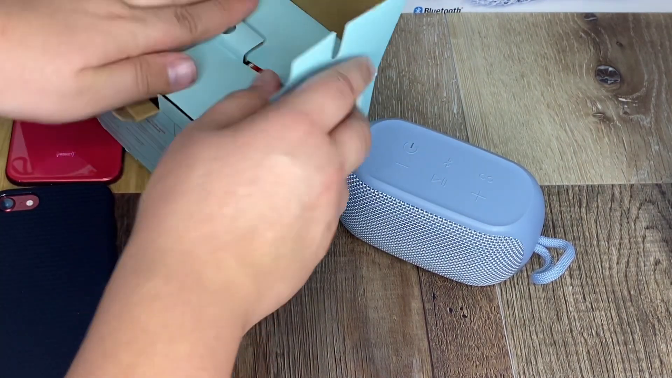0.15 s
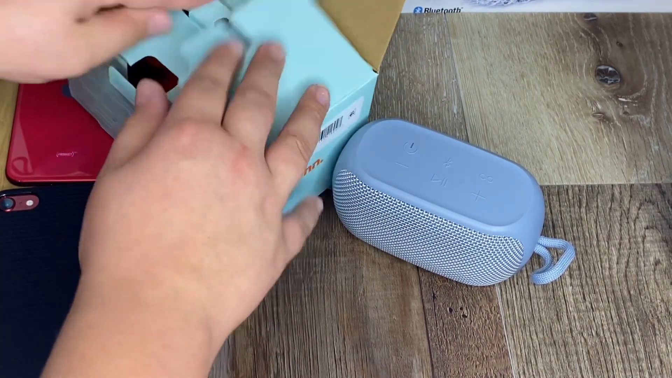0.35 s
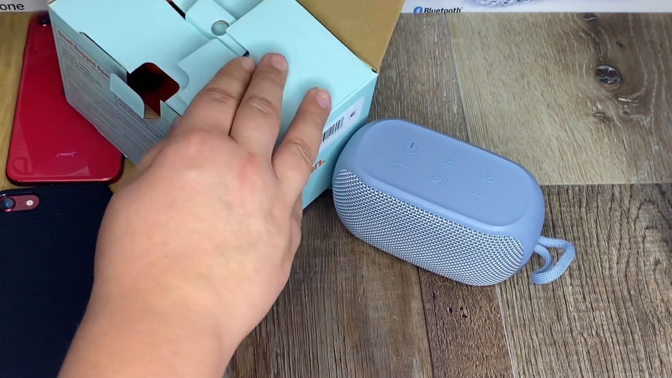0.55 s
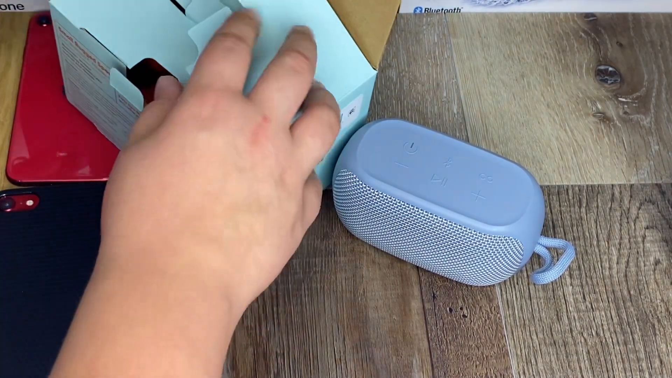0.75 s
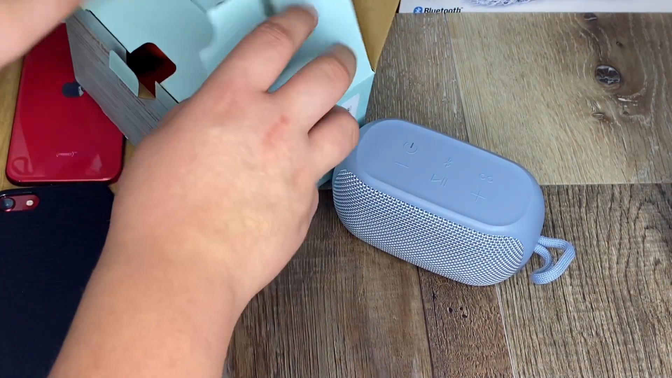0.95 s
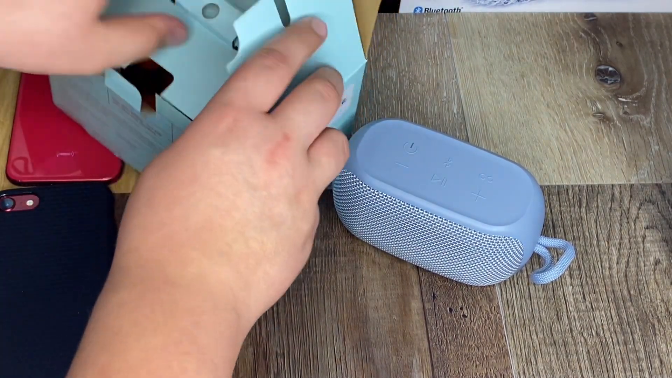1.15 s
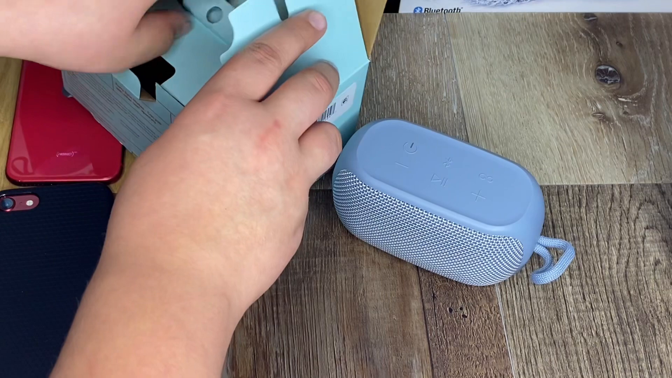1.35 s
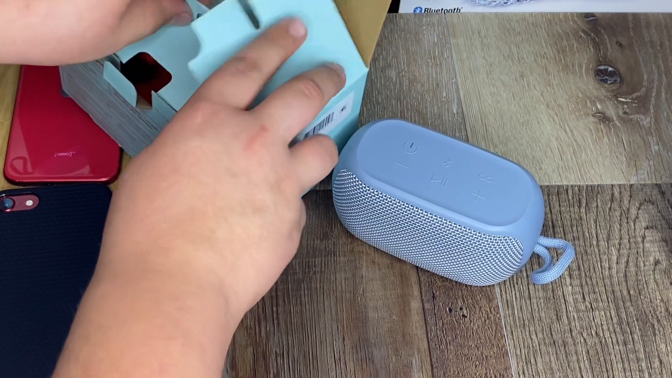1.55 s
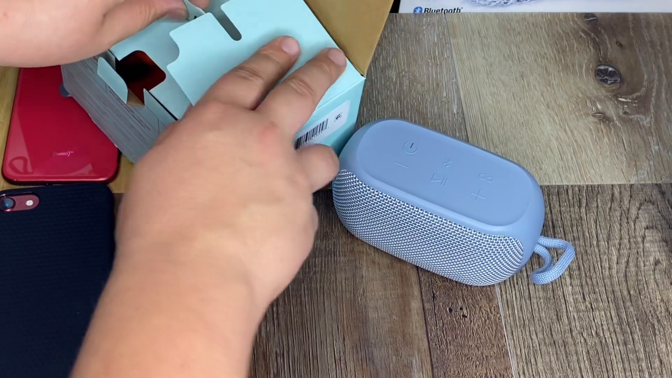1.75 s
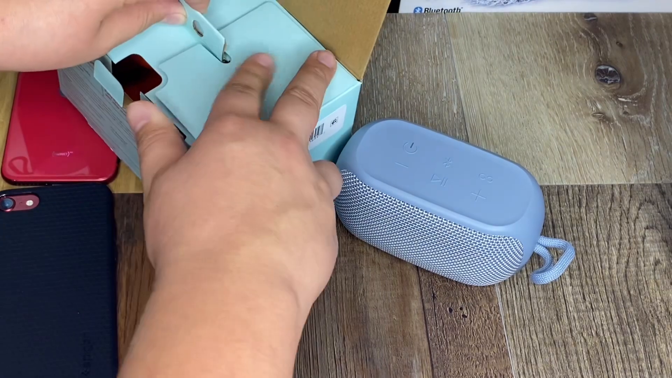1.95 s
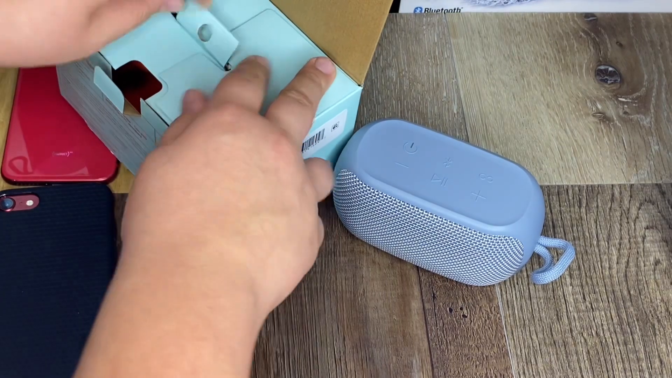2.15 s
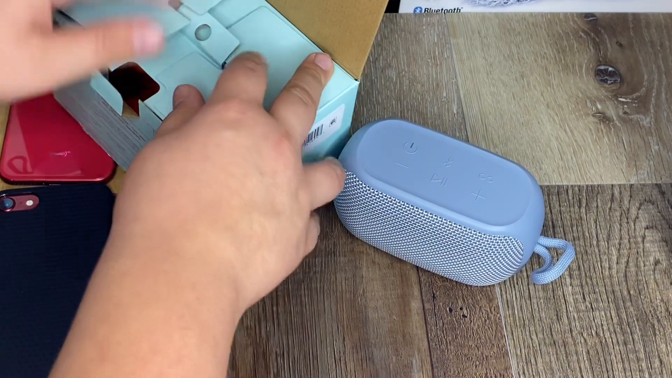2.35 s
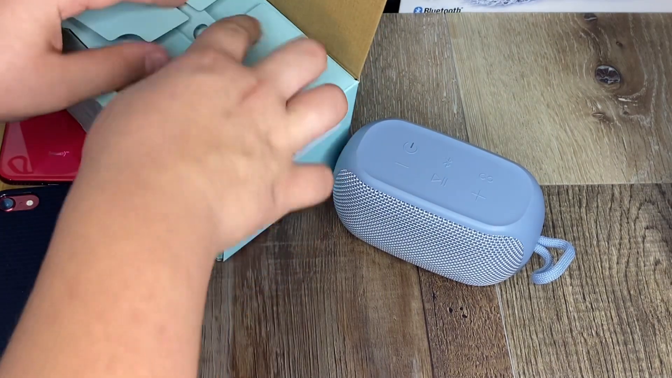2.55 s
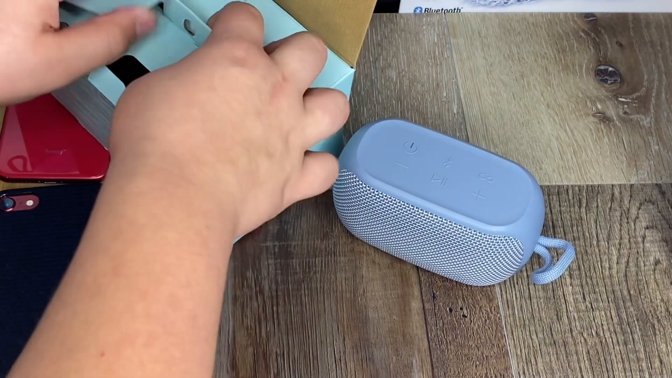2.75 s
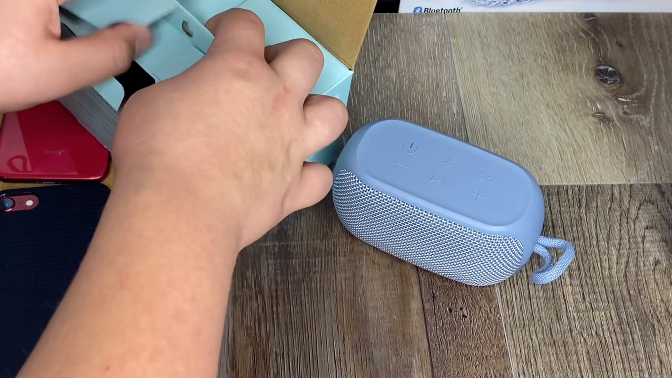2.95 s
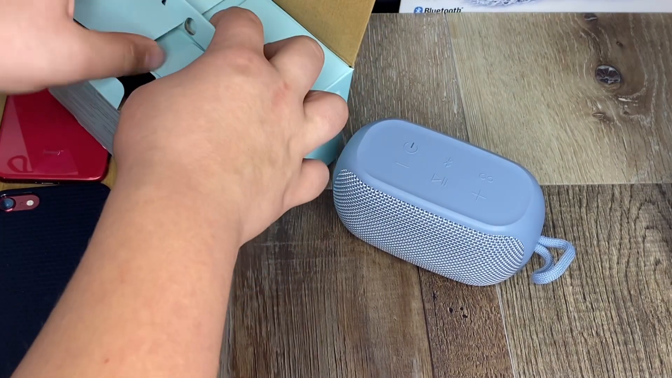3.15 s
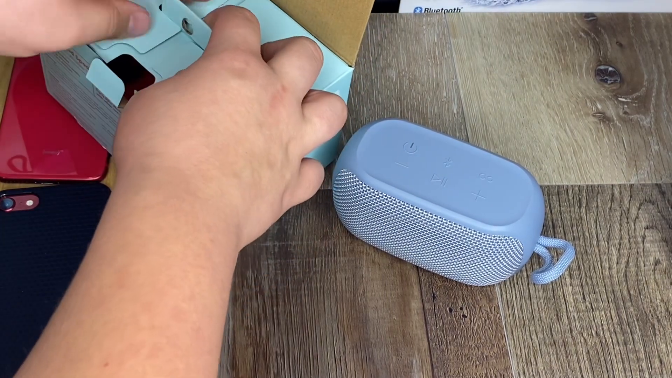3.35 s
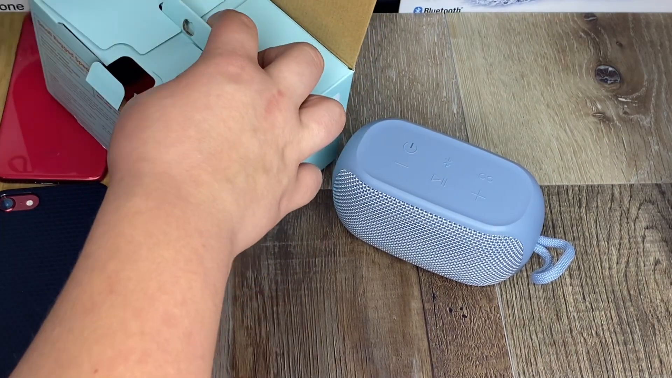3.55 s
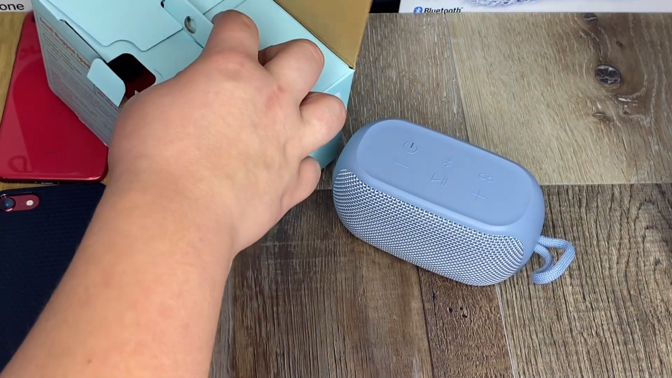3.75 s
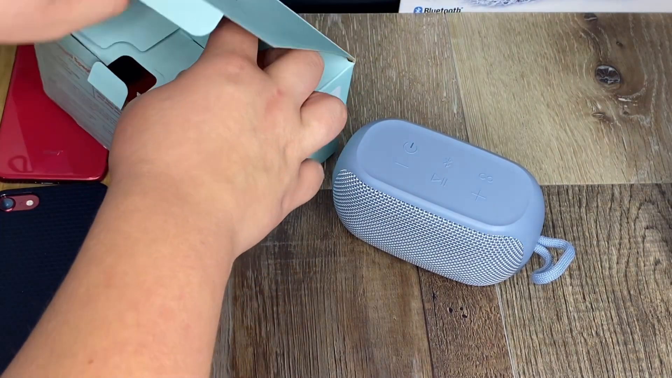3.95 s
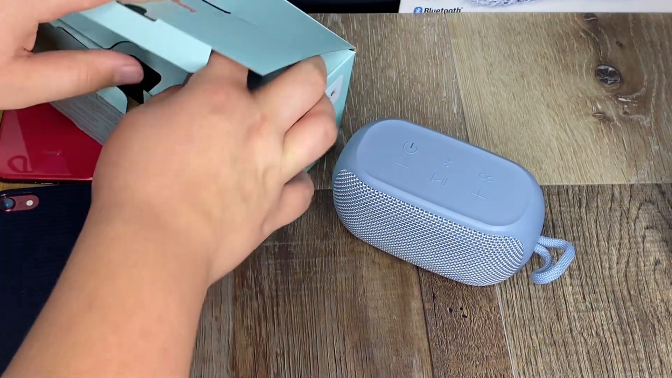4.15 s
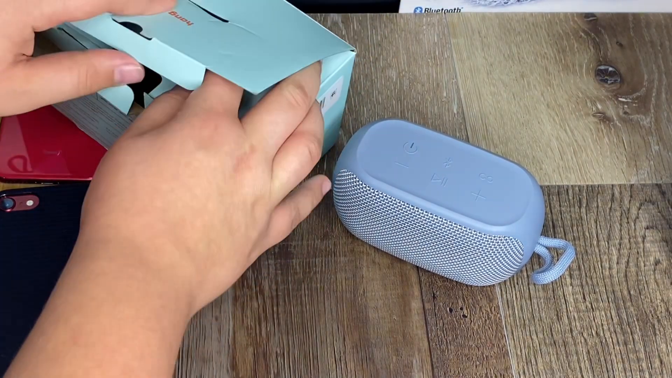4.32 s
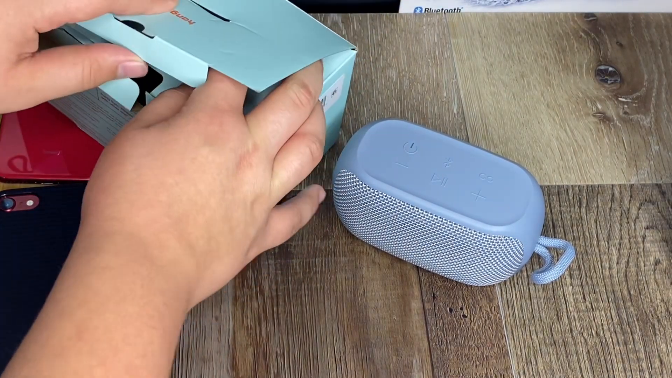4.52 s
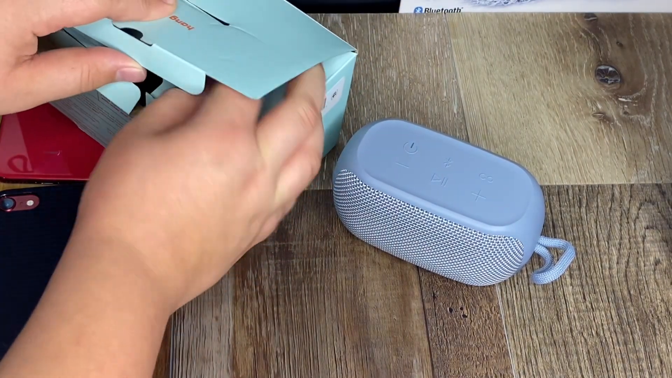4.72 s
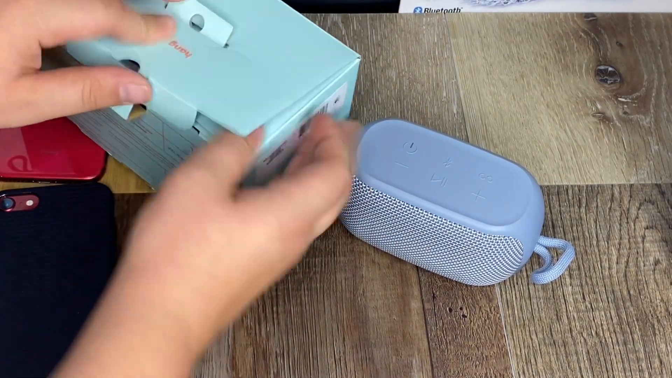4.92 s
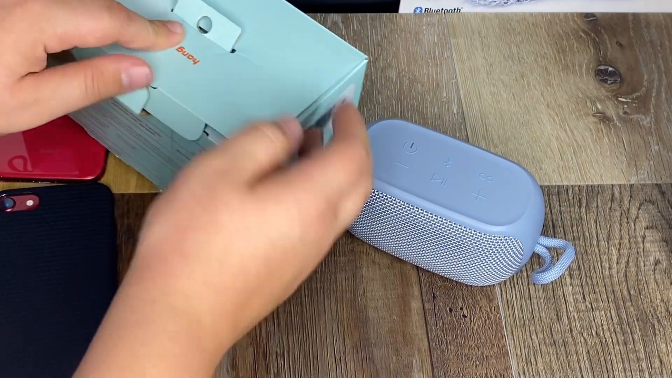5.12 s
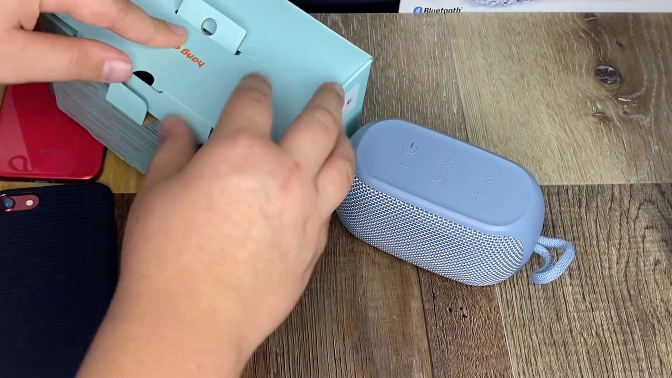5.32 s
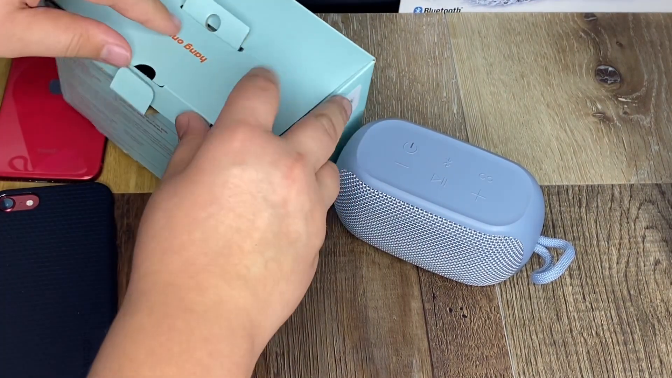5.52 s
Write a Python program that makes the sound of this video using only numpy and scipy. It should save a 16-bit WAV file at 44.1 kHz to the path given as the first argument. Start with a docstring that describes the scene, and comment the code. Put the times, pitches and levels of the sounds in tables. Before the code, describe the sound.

Two hands pack a small paperboard box on a table. Inserts and flaps slide with a dry, grainy rasp, broken by sharp little snaps, hollow knocks and a few brief squeaks. An insert drops in with a low thump and a cluster of cracks. Near the end the lid tab pops home loudly and fingers pat the lid. The microphones are close, in a small room with a faint low hum.

```python
"""Packing a paperboard box

Two hands pack a small box on a table in a small room, close to a pair of microphones.
Inserts and flaps slide with a grainy rasp as their fibres catch and let go. Edges snag and snap
free, and the hollow box answers with short knocks. An insert drops in with a low thump, the lid
tab is pushed home with a loud pop, then fingers pat the lid."""
import sys
import numpy as np
from scipy import signal
from scipy.fft import rfft, irfft, next_fast_len
from scipy.io import wavfile

SR = 44100
rng = np.random.default_rng(int(sys.argv[2]) if len(sys.argv) > 2 else 0)


def inscribe(sig):
    """Save sig as 16-bit PCM at rate SR to the path in sys.argv[1].

    A 1-D sig is mono; a 2-D sig holds one channel per row.
    Samples are clipped to [-1, 1] before scaling.
    """
    pcm = np.round(np.clip(np.atleast_2d(sig).T, -1, 1) * 32767)
    wavfile.write(sys.argv[1], SR, pcm.astype(np.int16))


N = 250488
T = np.arange(N) / SR


def from_db(db):
    """Decibels to gain."""
    return 10 ** (np.asarray(db) / 20)


def unit_rms(x):
    """Scale to an rms of 1."""
    return x / np.sqrt(np.mean(x ** 2) + 1e-20)


def at_hz(curve, hz):
    """Read a curve on a log-frequency axis."""
    freqs, values = np.transpose(curve)
    return np.interp(np.log(hz + 1e-3), np.log(freqs), values)


def filtered(x, response):
    """Pass x through a frequency response, given as a function of Hz."""
    size = next_fast_len(x.shape[-1] + 4096)
    hz = np.arange(size // 2 + 1) * SR / size
    return irfft(rfft(x, size) * response(hz), size)[..., :x.shape[-1]]


def eq(x, curve):
    """Filter x by a curve of freq_hz, gain_db."""
    return filtered(x, lambda hz: from_db(at_hz(curve, hz)))


def unity_eq(x, curve):
    """Colour white input without changing its power."""
    power = np.mean(from_db(at_hz(curve, np.linspace(0, SR / 2, 2000))) ** 2)
    return eq(x, curve) / np.sqrt(power)


def drift(rate_hz):
    """A random modulator that glides from value to value, with an rms of 1."""
    knots = rng.standard_normal(4000)
    return unit_rms(np.interp(T * rate_hz, np.arange(len(knots)), knots))


def add(out, start_s, sound):
    """Mix a sound into out at start_s."""
    start = max(int(start_s * SR), 0)
    out[start:start + len(sound)] += sound[:N - start]


def resonance(x, hz, width_hz):
    """One resonance with a peak gain of 1."""
    radius = np.exp(-np.pi * width_hz / SR)
    poles = [1, -2 * radius * np.cos(2 * np.pi * hz / SR), radius ** 2]
    return signal.lfilter(np.array([1, 0, -1]) * (1 - radius ** 2) / 2, poles, x + 1e-18)


def ring(clicks, hz, t60_s):
    """Each click sets off a decaying sine of its own height."""
    radius, angle = np.exp(-np.log(1000) / (t60_s * SR)), 2 * np.pi * hz / SR
    return signal.lfilter([0, np.sin(angle)], [1, -2 * radius * np.cos(angle), radius ** 2], clicks + 1e-18)


# Bass-heavy colour of the room tone: freq_hz, gain_db
ROOM_TONE_EQ = [(20, -27.5), (33, -6), (48, 6), (75, 4.5), (140, -9.5), (200, -14), (600, -25.5),
                (1200, -33.5), (4000, -40.5), (16000, -57.5)]
# Stereo width of the room tone and the reverb: freq_hz, side_gain_db
ROOM_WIDTH = [(60, -19), (200, -8), (500, 2), (1200, 3), (2000, -4), (3500, -14), (7000, -6), (10000, -3)]
# Faint hum in the room: pitch_hz, rms_db
HUM = [(59.5, -66.5), (91.3, -59.5), (143, -68), (183, -78)]


def room_tone():
    """Low room noise, nearly alike on both sides, and a wavering hum."""
    mid, side = eq(rng.standard_normal((2, N)), ROOM_TONE_EQ)
    side = eq(side, ROOM_WIDTH)
    hum = sum(from_db(db) * np.sqrt(2) * np.sin(2 * np.pi * hz * T + .5 * drift(4.7)) for hz, db in HUM)
    return from_db(-60.5) * unit_rms(np.array([mid + side, mid - side])) + hum


# Early reflections off the table and nearby things, ahead of the width EQ: delay_ms, left_db, right_db
REFLECTIONS = [(4.3, -29, -24.5), (9.6, -24.5, -14), (11.7, -26.5, -20.5), (16.4, -14.5, -17)]
# Colour of the reverb tail: freq_hz, gain_db
TAIL_EQ = [(60, 0), (150, 3), (230, 1.5), (400, 1), (650, -4), (1200, 2), (2500, -5), (5000, -4),
           (9000, -12.5), (16000, 0)]


def reverb(x, tail_db, low_t60_s, high_t60_s, build_s):
    """The small room returns a few near echoes and a short diffuse tail."""
    t = T[:int(.8 * SR)]
    tail = np.zeros((2, len(t)))
    for band, t60_s in ("low", low_t60_s), ("high", high_t60_s):
        crossover = signal.butter(2, 2500, band, fs=SR, output="sos")
        tail += signal.sosfilt(crossover, rng.standard_normal(tail.shape)) * np.exp(-np.log(1000) * t / t60_s)
    tail *= 1 - np.exp(-(t / build_s) ** 2)
    mid, side = from_db(tail_db) * eq(tail / np.linalg.norm(tail[0]), TAIL_EQ)
    for delay_ms, left_db, right_db in REFLECTIONS:
        at = int(delay_ms * SR / 1000)
        mid[at] += (from_db(left_db) + from_db(right_db)) / 2
        side[at] += (from_db(left_db) - from_db(right_db)) / 2
    side = eq(side, ROOM_WIDTH)
    return signal.fftconvolve(x[None], np.array([mid + side, mid - side]), axes=1)[:, :N]


# Hand strokes; the two long, faint ones are the hands shifting their grip:
# start_s, length_s, level_db, brightness_db
STROKES = [(-.03, .3, -43, -2.5), (0.291, .12, -49, 3.5), (0.553, .085, -65.5, 12), (0.67, .17, -64, 1),
           (0.835, 2.64, -57, -7), (0.854, 0.32, -52.5, 5), (1.11, 0.097, -40.5, -3),
           (1.25, 0.24, -53, -0.5), (1.559, 0.061, -45, 0.5), (1.655, .17, -45.5, -1),
           (1.831, 0.046, -43.5, -1.5), (2.099, 0.072, -43, 3.5), (2.23, 0.14, -56.5, 3.5),
           (2.324, 0.043, -43, -1), (2.439, 0.27, -56, 2.5), (2.932, 0.069, -56.5, -1.5),
           (3.04, 0.12, -53.5, 7.5), (3.184, 0.082, -47, 1.5), (3.334, 0.11, -60.5, 6.5),
           (3.697, 1.7, -57, -16), (3.787, 0.12, -42.5, 5), (3.95, 0.15, -63.5, 15),
           (4.068, 0.073, -47.5, -2), (4.186, 0.062, -48, -2), (4.482, 0.37, -56.5, -5),
           (4.683, 0.19, -47.5, 0), (4.882, 0.079, -43.5, 7.5), (4.933, 0.16, -40, -21.5),
           (5.141, 0.033, -56.5, 11), (5.233, 0.076, -45, -7), (5.336, 0.17, -46, -16),
           (5.498, .11, -50.5, -0.5)]


def stroke_envelopes(attack_s=0.02, release_s=0.049):
    """Each push swells, holds and fades in rub, rasp and hiss; overlapping strokes add in power."""
    power = np.zeros((3, N))
    for start_s, length_s, db, bright_db in STROKES:
        swell = np.clip((T - start_s) / attack_s, 0, 1)
        fade = np.exp(-np.clip((T - start_s - length_s) / release_s, 0, 20))
        rasp_db = db - 8 + 0.64 * bright_db
        hiss_db = db - 11.5 + bright_db
        power += np.outer(from_db([db, rasp_db, hiss_db]), swell * fade) ** 2
    return np.sqrt(power + 1e-12)


def fibres(clicks_per_s, spread_db, clump_db, rush_db):
    """Fibres catch and let go: clumps of tiny clicks of uneven size over a smooth rush."""
    sizes = from_db(spread_db * np.minimum(rng.exponential(1, N), 4)) * rng.choice([-1, 1], N)
    clicks = unit_rms(sizes * (rng.random(N) < clicks_per_s / SR))
    rush = from_db(rush_db) * rng.standard_normal(N)
    return unit_rms((clicks + rush) * from_db(clump_db * drift(170)))


def moving_contact(x, depth_db, rate_hz):
    """As the contact point moves, each band swells and fades on its own."""
    centres_hz = np.geomspace(800, 14000, 14)
    spectrum, hz = rfft(x), np.arange(N // 2 + 1) * SR / N
    bands = (irfft(spectrum * np.interp(hz, centres_hz, solo), N) for solo in np.eye(len(centres_hz)))
    return unit_rms(sum(band * from_db(depth_db * drift(rate_hz)) for band in bands))


# Bending resonances of a flap: pitch_hz, width_hz, relative_db
FLAP_MODES = [(1067, 980, -1.5), (1790, 343, 3.5), (2140, 130, 2.5), (2835, 170, 1.5), (3900, 530, -9.5)]


def flap(x):
    """A flap rings in all its modes at once, alternating in polarity; white input keeps its power."""
    def modes(drive):
        return sum((-1) ** k * from_db(db) * resonance(drive, hz, width_hz)
                   for k, (hz, width_hz, db) in enumerate(FLAP_MODES))
    return modes(x) / np.linalg.norm(modes(signal.unit_impulse(2048)))


# Low rub of the box body: freq_hz, gain_db
RUB_EQ = [(30, -13.5), (60, -18.5), (130, 1), (200, -5), (300, 2.5), (430, -2.5), (620, 5), (800, -5.5),
          (1100, -26.5), (2000, -40)]
# Midrange rasp of the board: freq_hz, gain_db
RASP_EQ = [(500, -5), (900, 6), (1400, -4), (1900, 1), (2600, 2), (3400, -4.5), (4500, -19), (7000, -15.5)]
# Airy hiss of the cut edge: freq_hz, gain_db
HISS_EQ = [(2500, -8), (4300, 2), (5500, 1), (7500, -3), (10000, -5), (12500, -8.5), (16000, -19.5)]


def sliding(envelopes, rub_db, rasp_db, flap_share):
    """Board slides on board: one stream of slips shakes the box, the flap and the cut edge."""
    rub, rasp, hiss = envelopes
    grain = fibres(clicks_per_s=1200, spread_db=3.9, clump_db=2.4, rush_db=-2)
    slips = moving_contact(grain, depth_db=2.5, rate_hz=28)
    body = from_db(rub_db) * rub * unity_eq(slips, RUB_EQ)
    flap_ring = flap(np.roll(slips, SR // 500))
    board = np.sqrt(1 - flap_share) * unity_eq(slips, RASP_EQ) + np.sqrt(flap_share) * flap_ring
    edge = hiss * unity_eq(slips, HISS_EQ)
    return body + from_db(rasp_db) * rasp * board + edge


# Slides that groan, swish or squeak: start_s, length_s, pitch_hz, nominal_width_hz, relative_db
SQUEAKS = [(0, 0.048, 2630, 700, -49.5), (0.571, 0.1, 7400, 1400, -66), (1.858, 0.018, 4730, 500, -47.5),
           (2.672, 0.037, 594, 30, -44), (2.968, 0.025, 5200, 900, -58), (3.05, 0.09, 4170, 2000, -54.5),
           (3.36, 0.047, 7500, 1000, -54.5), (4.444, 0.073, 650, 40, -55), (4.876, 0.034, 6650, 600, -47),
           (5.078, 0.05, 736, 49.7, -65), (5.242, 0.033, 634, 40, -42.5), (5.551, 0.075, 826, 40, -47.5)]


def squeaks(trim_db):
    """Stick and slip locks briefly onto one resonance."""
    out = np.zeros(N)
    for start_s, length_s, hz, width_hz, db in SQUEAKS:
        voice = rng.standard_normal(SR // 2)
        for _ in range(2):
            voice = resonance(voice, hz, 1.26 * width_hz)
        size = int(length_s * SR)
        add(out, start_s, from_db(db + trim_db) * unit_rms(voice[-size:] * signal.windows.tukey(size)))
    return out


# Length of a small tick, and the delay from a crack to its panel's kick
TICK_MS, KICK_LAG_S = 3.5, 0.002438


def catches(envelopes, count, spread_db):
    """Sliding board snags at random, as hard as the slide at that moment; gives rows like SNAPS."""
    when, edge, panel, strength = rng.random((count, 4)).T
    at = (when * (N - 1)).astype(int)
    rub_db, rasp_db, hiss_db = 20 * np.log10(envelopes[:, at]) + spread_db * (2 * strength - 1)
    crack_db, treble_db, kick_db = rasp_db + 4, hiss_db + 2, rub_db + 9
    edge_hz = np.interp(edge, [0, 1], [1500, 4200])
    panel_hz = np.interp(panel, [0, 1], [336, 702])
    length_ms = np.full(count, TICK_MS)
    return list(zip(at / SR, length_ms, crack_db, treble_db, edge_hz, crack_db, kick_db, panel_hz))


def swing(out, start_s, peak_db, hz, swell_ms):
    """Mix in one swing of heavily damped board: it swells for about a cycle and dies in a few more."""
    t = T[:SR // 5]
    age = t * 1000 / swell_ms
    add(out, start_s, from_db(peak_db) * age * np.exp(1 - age) * np.sin(2 * np.pi * hz * t))


# Low bumps of the box: start_s, peak_db, pitch_hz, swell_ms
THUMPS = [(1.168, -48.5, 170, 2.8), (1.24, -49.5, 135, 7), (1.905, -40.5, 137.7, 4.9), (1.915, -47, 60, 12),
          (2.2, -39.5, 156, 4.9), (2.347, -36, 145, 3.7), (3.709, -30, 145.4, 12), (3.79, -45, 52, 25),
          (3.858, -32.5, 166.7, 5.3), (4.928, -34.5, 149, 7.9), (4.932, -43, 50, 20)]


def thumps():
    """The whole box bumps on the table."""
    out = np.zeros(N)
    for thump in THUMPS:
        swing(out, *thump)
    return out


# A fingertip or a flap lands on a panel: start_s, relative_db, pitch_hz
TAPS = [(0.3153, -26.5, 425), (0.323, -28, 470), (0.6391, -40.5, 378), (0.6574, -38.5, 624),
        (0.848, -34.5, 605), (1.0848, -31, 660), (1.2487, -29, 298), (1.335, -31.5, 390),
        (1.6206, -28, 546), (1.7147, -31.5, 595), (1.827, -25, 537), (2.1942, -32, 650), (2.35, -29, 320),
        (2.9356, -38.5, 300), (3.8808, -20, 590), (4.2454, -25.5, 544), (4.2963, -32, 348),
        (4.595, -38, 640), (4.695, -30, 333), (4.9365, -10.5, 430), (4.977, -22, 575), (5.016, -31, 440),
        (5.1442, -36, 325), (5.2778, -37.5, 443), (5.3137, -34.5, 270), (5.3622, -35, 320),
        (5.4133, -36.5, 625), (5.4515, -35, 330), (5.536, -35.5, 300), (5.558, -32, 533),
        (5.5857, -36.5, 406)]


def taps(tick_db, treble_db, tick_hz):
    """A tap is mostly panel kick, with a dull tick below it in level; gives rows like SNAPS."""
    return [(start_s - KICK_LAG_S, TICK_MS, db + tick_db, db + treble_db, tick_hz, db + tick_db, db, hz)
            for start_s, db, hz in TAPS]


# Hollow ring of the box's air and walls: pitch_hz, relative_db, t60_s
BOX_MODES = [(146.9, -27.5, 0.47), (289, -30.5, 0.13), (362.6, -25, 0.081), (430, -15.5, 0.097),
             (624, -11.5, 0.095), (783, -14, 0.049), (920, -23.5, 0.077), (1154, -20.5, 0.019)]


def knocks(hits, panel_trim_db, box_trim_db, spread_db):
    """The kicked panel swings, and each mode of the box rings on with a strength that varies by hit."""
    kicks = [(start_s + KICK_LAG_S, db, hz) for start_s, *_, db, hz in hits if start_s + KICK_LAG_S < T[-1]]
    out = np.zeros(N)
    for start_s, db, hz in kicks:
        swing(out, start_s, db + panel_trim_db, hz, swell_ms=2.05)
    kick_s, kick_db, _ = np.transpose(kicks)
    strengths = from_db(spread_db * rng.standard_normal((len(kicks), len(BOX_MODES))))
    for (hz, mode_db, t60_s), strength in zip(BOX_MODES, strengths.T):
        clicks = np.zeros(N)
        clicks[(kick_s * SR).astype(int)] = from_db(kick_db + mode_db + box_trim_db) * strength
        out += ring(clicks, hz, t60_s)
    return out


# Bright spit on top of a crack: freq_hz, gain_db
SPIT_EQ = [(2500, -14), (4300, 4), (5500, 3.5), (7500, -0.5), (10000, -2), (12500, -8), (16000, -10)]


def cracks(hits, crack_trim_db, treble_trim_db, edge_trim_db, rise_ms, fall_ms):
    """A few milliseconds of dense slips ring the flap and the edge, and spit treble."""
    ms = T[:SR // 25] * 1000
    crack, treble, edge = np.zeros((3, N))
    for start_s, length_ms, crack_db, treble_db, edge_hz, edge_db, *_ in hits:
        envelope = (1 - np.exp(-ms / rise_ms)) * np.exp(-np.maximum(ms - length_ms * 0.82, 0) / fall_ms)
        slips, spit, edge_drive = rng.standard_normal((3, len(ms))) * envelope
        edge_ring = resonance(edge_drive, edge_hz, width_hz=380)  # well-damped board rings only briefly
        length_gain = np.sqrt(length_ms * SR / 1000)
        layers = (crack, slips, crack_db), (treble, spit, treble_db), (edge, edge_ring, edge_db)
        for track, burst, db in layers:
            add(track, start_s, from_db(db) * length_gain * burst / np.linalg.norm(burst))
    return (from_db(crack_trim_db) * flap(crack)
            + from_db(treble_trim_db) * unity_eq(treble, SPIT_EQ)
            + from_db(edge_trim_db) * edge)


# Edges snapping free, levels ahead of the trims; the last is the lid tab popping home:
# start_s, length_ms, crack_db, treble_db, edge_hz, edge_db, kick_db, panel_hz
SNAPS = [(0.073, 6.6, -33, -51, 4730, -41, -31.5, 860), (0.081, 7.8, -37, -39.5, 2950, -44, -27, 447),
         (0.093, 3.9, -42, -40, 2540, -37, -22.5, 657), (0.1286, 6.3, -28, -34, 1210, -37.5, -29, 400),
         (0.174, 5.6, -46, -52, 2030, -44, -30.5, 630), (0.383, 3, -38, -44, 2370, -44, -33, 353),
         (0.971, 2.9, -31.5, -38.5, 4400, -43, -28, 542), (1.162, 8.4, -31, -47, 1340, -36.5, -21, 362),
         (1.204, 2.3, -42, -58, 2650, -42, -38, 354), (1.2226, 5.7, -28, -32, 2590, -19, -40, 400),
         (1.601, 6.4, -41.5, -56, 4550, -50, -33, 440), (1.7462, 4.5, -31.5, -36, 2500, -24.5, -24, 516),
         (1.871, 10.5, -40, -45, 2410, -36.5, -35, 390), (2.116, 4.6, -40, -45, 3630, -46.5, -29, 465),
         (2.3400, 2, -28, -28.5, 1410, -28.5, -23, 612), (2.5482, 3.4, -55, -52, 2920, -50, -38, 536),
         (3.14, 4.9, -42.5, -49, 5600, -48, -38.5, 680), (3.261, 2.5, -40, -37, 3960, -44, -34, 564),
         (3.274, 1.9, -36, -38, 4130, -33, -33.5, 550), (3.322, 8.3, -38.5, -40, 3950, -45, -33, 670),
         (3.6991, 8.9, -47, -49.5, 5900, -53.5, -36, 299), (3.774, 4.2, -33.5, -42, 1907, -32.5, -32, 585),
         (3.78, 6.7, -27, -31, 1520, -31.5, -16.5, 596), (3.8163, 3.7, -31, -33.5, 7300, -26.5, -39, 500),
         (3.8253, 5.8, -38, -31.5, 2750, -28, -38, 500), (3.8700, 6.6, -26.5, -29, 2240, -21, -21.5, 396),
         (4.376, 2.9, -49.5, -59, 3120, -53, -59, 504), (4.8, 5, -40, -44.5, 1620, -38.5, -29, 720),
         (4.859, 4, -43, -40, 2700, -45, -43, 500), (4.897, 5.9, -40, -44, 6540, -50, -32, 815),
         (4.9233, 10, -20, -26.5, 3880, -34.5, -2.5, 542)]


def snaps(small_hits):
    """An edge slips free with a crack and kicks its panel; taps and catches sound the same way."""
    hits = SNAPS + small_hits
    attack = cracks(hits, crack_trim_db=-2.5, treble_trim_db=-.5, edge_trim_db=-2.5,
                    rise_ms=0.14, fall_ms=1.94)
    return attack + knocks(hits, panel_trim_db=-2.5, box_trim_db=-0.5, spread_db=3.5)


# Pan of the direct sound, with the box left of the microphones: freq_hz, left_minus_right_db
PAN = [(150, 0), (330, 1.5), (520, 7), (800, 6), (1200, .7), (2500, .2)]


def scene():
    """Slides, snaps and knocks reach the microphones directly and through the room, over room tone."""
    envelopes = stroke_envelopes()
    box = sliding(envelopes, rub_db=-2, rasp_db=1, flap_share=0.018) + squeaks(trim_db=0.5)
    small_hits = taps(tick_db=-16, treble_db=-31, tick_hz=2350) + catches(envelopes, count=90, spread_db=3)
    box += snaps(small_hits) + thumps()
    direct = filtered(box, lambda hz: from_db(at_hz(PAN, hz) * np.array([[.5], [-.5]])))
    wet = reverb(box, tail_db=-7, low_t60_s=0.4, high_t60_s=0.39, build_s=0.0023)
    return direct + wet + room_tone()


# Phase between the two microphones: freq_hz, left_lead_rad
MIC_PHASE = [(150, 0), (520, .3), (1600, .4), (2300, 0), (7400, 0), (9200, -3.1), (11200, -6.3),
             (13300, -9.4), (15500, -12.5)]


def record(dry):
    """The two microphones part in phase in the top octave; deep bass and the very top are cut."""
    mics = filtered(dry, lambda hz: np.exp(1j * at_hz(MIC_PHASE, hz) * np.array([[.5], [-.5]])))
    low_cut = signal.butter(6, 36, "high", fs=SR, output="sos")
    high_cut = signal.ellip(10, .1, 80, 15900, fs=SR, output="sos")
    return signal.sosfilt(high_cut, signal.sosfilt(low_cut, mics))


dry = scene()
out = record(dry)
inscribe(out)
```